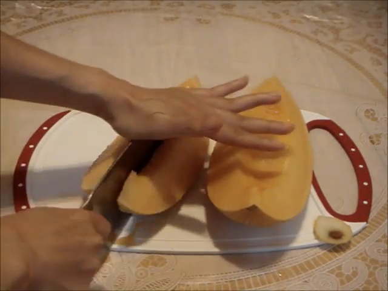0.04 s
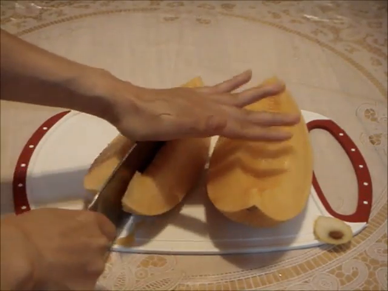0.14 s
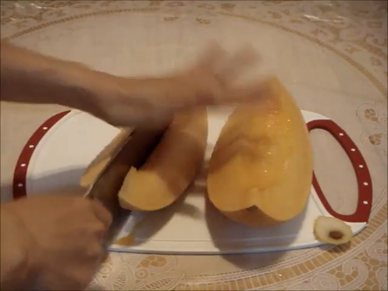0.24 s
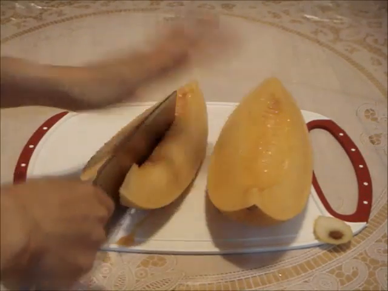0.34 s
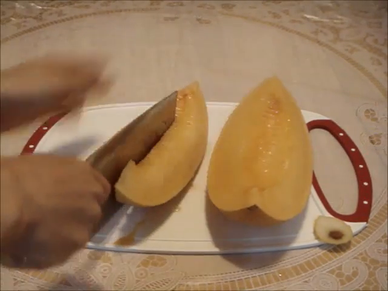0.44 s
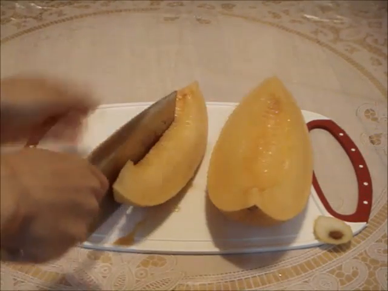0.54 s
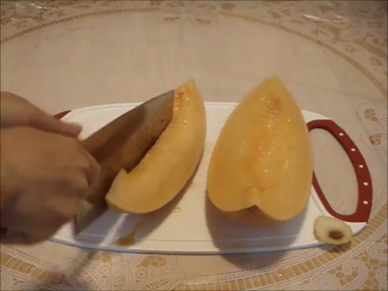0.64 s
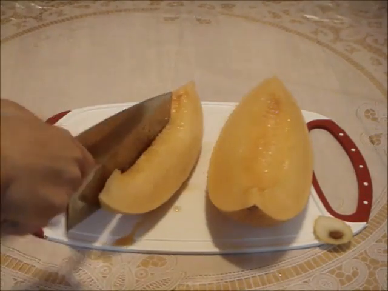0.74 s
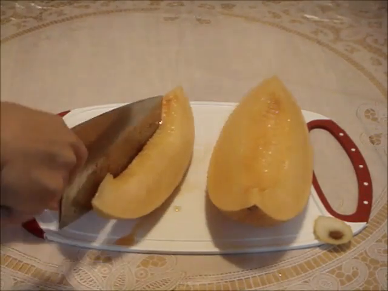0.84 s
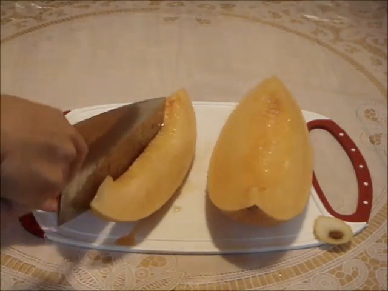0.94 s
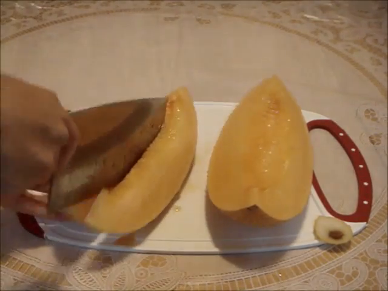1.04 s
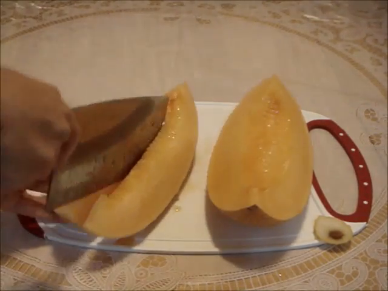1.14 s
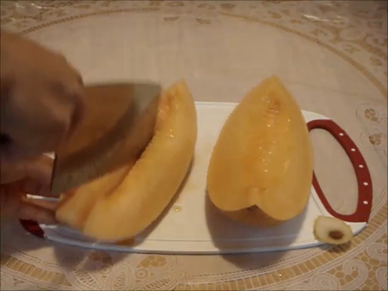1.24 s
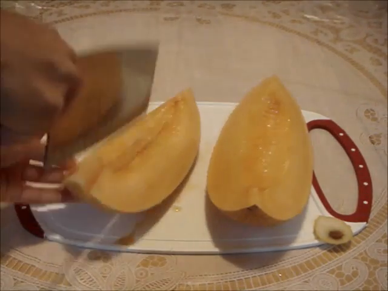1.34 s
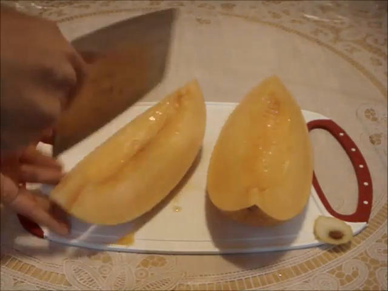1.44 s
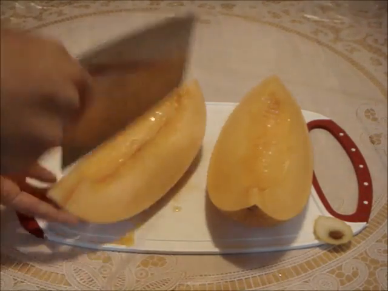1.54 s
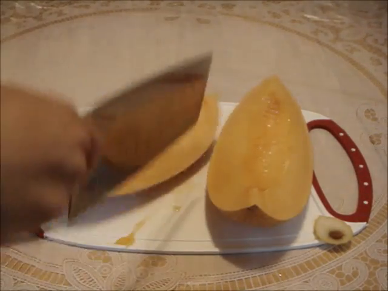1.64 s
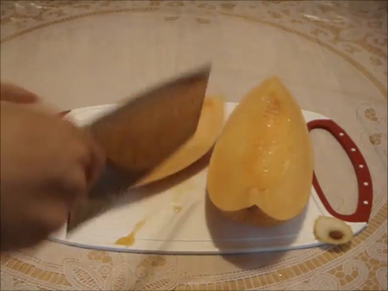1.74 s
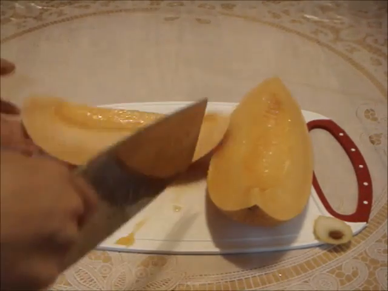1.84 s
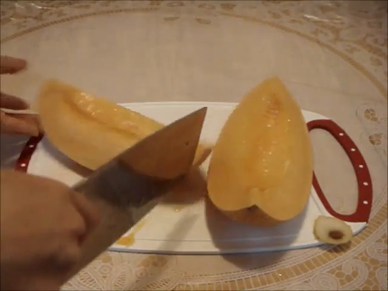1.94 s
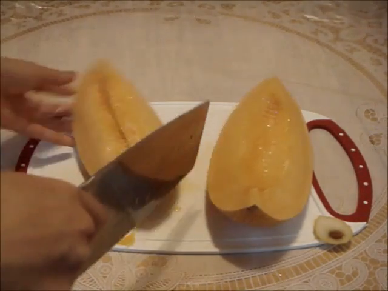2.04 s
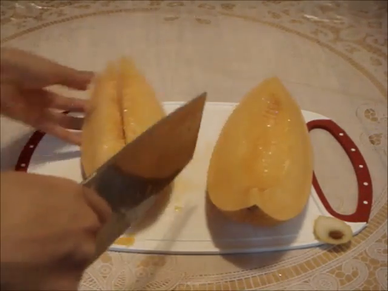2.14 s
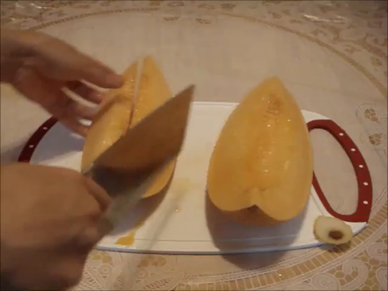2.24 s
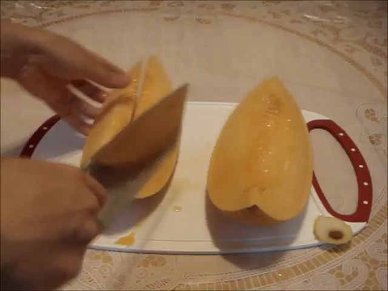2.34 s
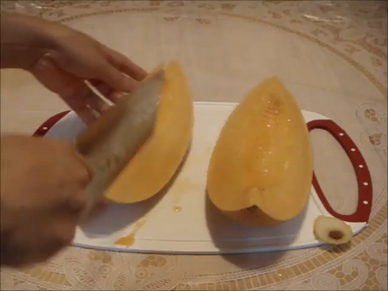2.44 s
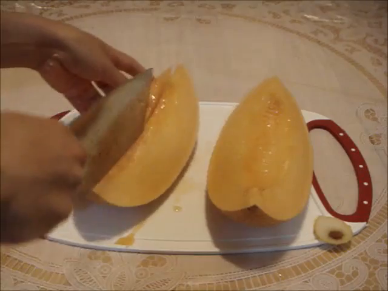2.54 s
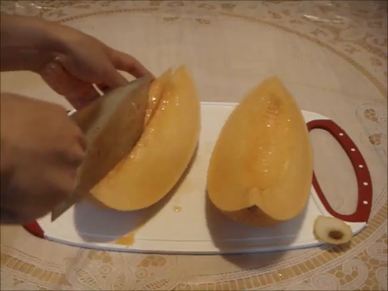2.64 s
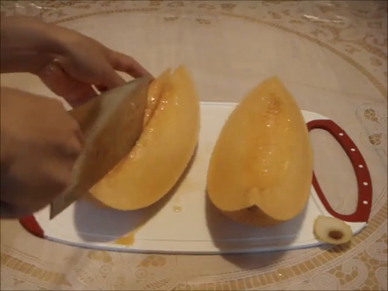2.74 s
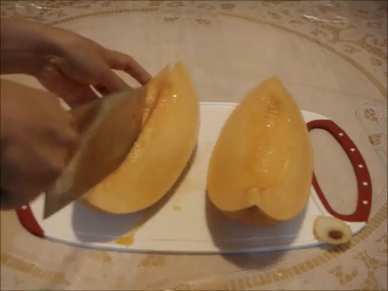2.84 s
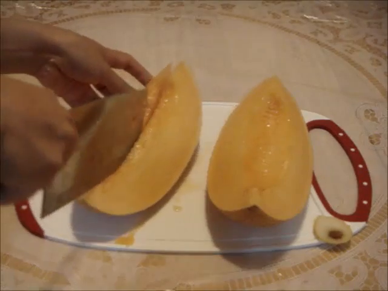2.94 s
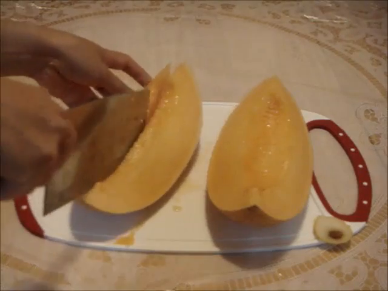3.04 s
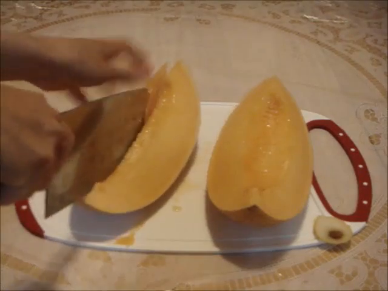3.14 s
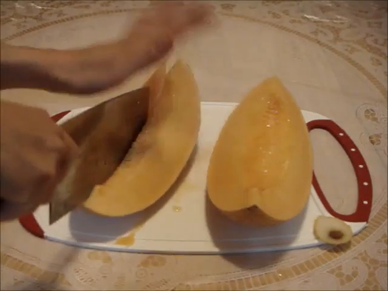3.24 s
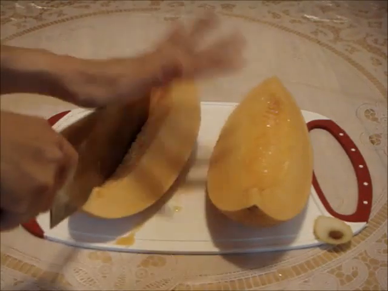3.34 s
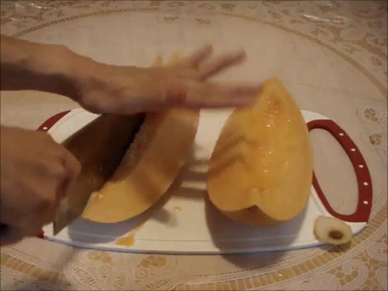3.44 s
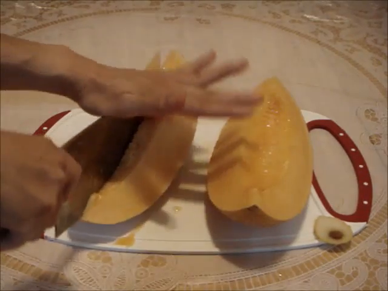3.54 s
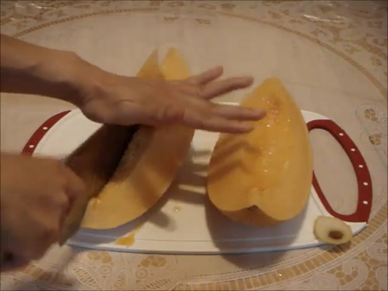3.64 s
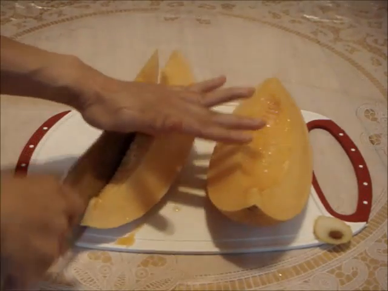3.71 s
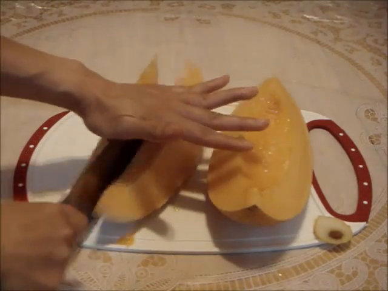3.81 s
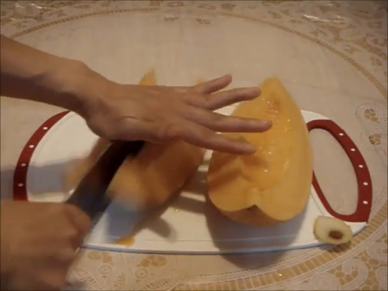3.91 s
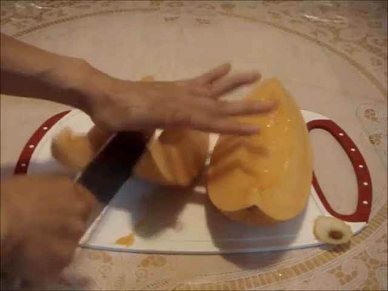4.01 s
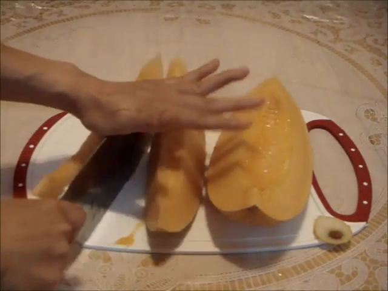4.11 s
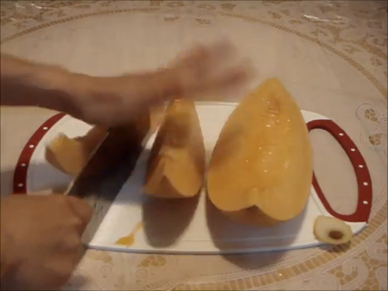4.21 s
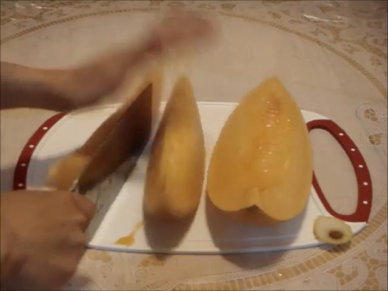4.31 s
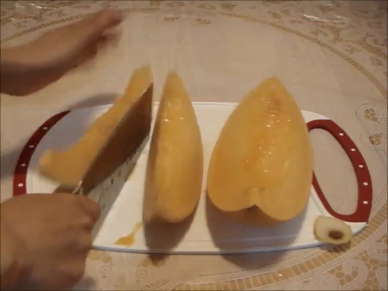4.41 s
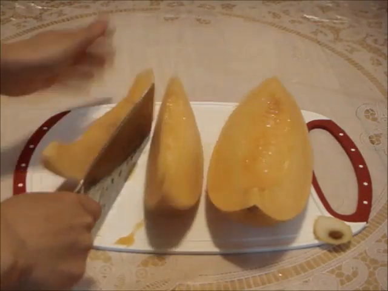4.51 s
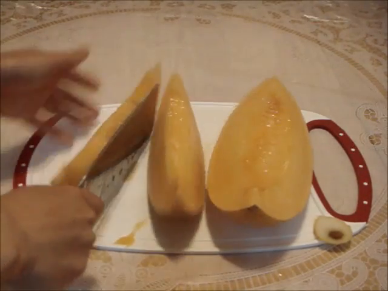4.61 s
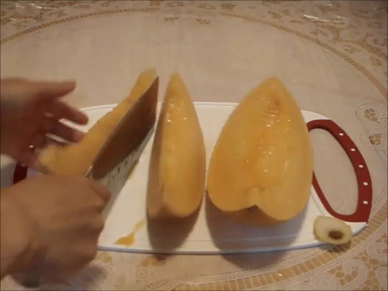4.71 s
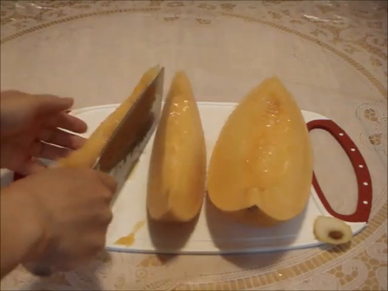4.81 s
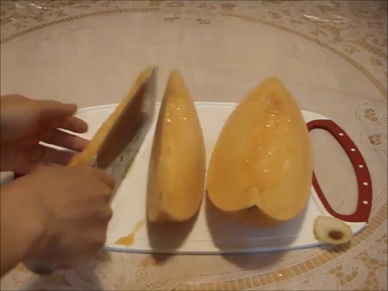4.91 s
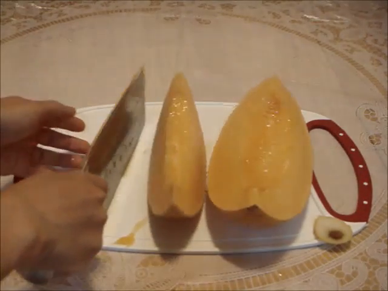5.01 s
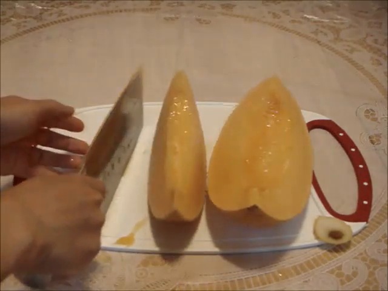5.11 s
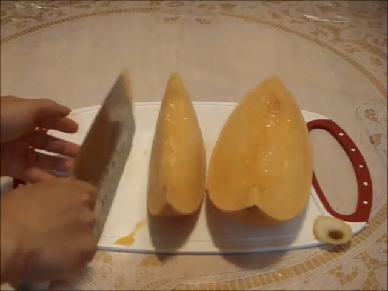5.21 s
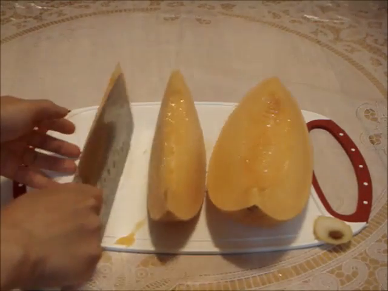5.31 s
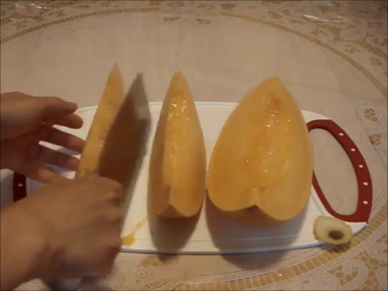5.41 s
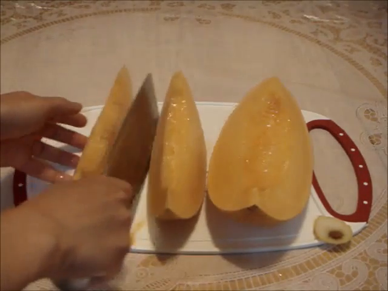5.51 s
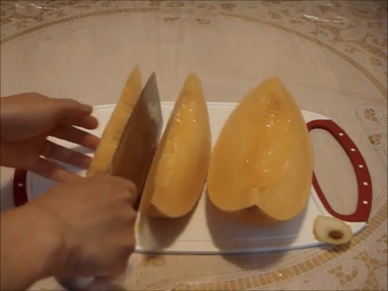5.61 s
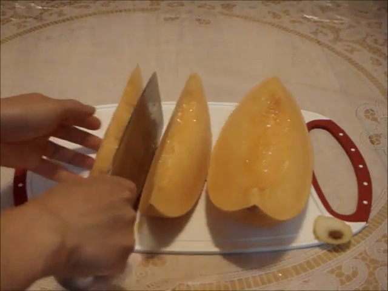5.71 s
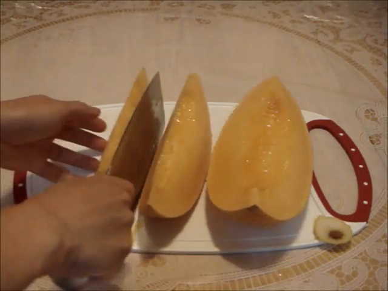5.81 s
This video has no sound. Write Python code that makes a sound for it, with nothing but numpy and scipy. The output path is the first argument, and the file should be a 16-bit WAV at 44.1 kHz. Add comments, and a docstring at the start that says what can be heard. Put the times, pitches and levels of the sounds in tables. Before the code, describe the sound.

In a reverberant kitchen, the tail of a hard knife blow rings from a plastic board and table. Small damped ticks and faint wet slides follow as the blade works through melon. After a quiet pause the rind crackles and splits with several heavy thuds and sharp clicks. Finally the steel blade scrapes the board in brief rough strokes. A close microphone adds steady soft hiss.

```python
"""A broad knife works through a melon on a plastic board in a hard-walled kitchen.
The blade has just slammed down: board and table ring, loose things clatter, and sparse taps make the echo.
Then small damped ticks and soft wet slides of filtered grit lie just above steady microphone hiss.
Later the rind cracks in dense crackle over the melon's body modes, and the halves thud with sharp clicks.
Last, the steel scrapes along: random slips rub the plastic and ring the modes of the blade."""
import sys
import numpy as np
from scipy import signal
from scipy.fft import rfft, irfft, next_fast_len
from scipy.io import wavfile
from scipy.ndimage import uniform_filter1d

SR = 44100
rng = np.random.default_rng(int(sys.argv[2]) if len(sys.argv) > 2 else 0)


def volts_from_db(level):
    """Convert decibel levels to linear amplitude ratios."""
    exponent = np.asarray(level, float) / 20
    return 10 ** exponent


def store_pcm(level_fs):
    """Save levels as 16-bit WAV."""
    pcm = np.round(np.clip(level_fs, -1, 1) * 32767).astype(np.int16)
    wavfile.write(sys.argv[1], SR, np.atleast_2d(pcm).T)


N = 258426  # samples heard
LEAD = 0.06  # s computed ahead of time 0, so that the slam is already ringing
FULL = N + round(LEAD * SR)
TIME = np.arange(FULL) / SR - LEAD  # s

# Blows on the board: t/s, push level/dB, contact time/ms, clatter level/dB, clatter colour f/Hz
BLOWS = [(-.018, -16, 0.92, -11, 650), (3.658, -27, 1.45, -26.5, 306), (3.889, -28, 1.7, -26.5, 634),
         (4.147, -30, 1.96, -35.5, 400), (4.166, -24, 3, -26, 190), (4.582, -49.5, 3.1, -60, 312),
         (4.977, -48, 1.9, -50, 302), (5.291, -62, 2.7, -43, 404)]
CLATTER_S = 0.015  # decay time constant
# Crack of the hardest blow, relative spectrum: f/Hz, level/dB
SLAM = [(88, -41), (150, -56), (195, -12), (347, -4), (629, -8.5), (818, -1.5), (1030, -7.5), (1220, -8.5),
        (1800, -15), (5130, -23), (9800, -39), (12700, -80), (21600, -120)]
SLAM_S, SLAM_DB = -0.018, -26.5
# Modes of the board and the table top under it: f/Hz, level/dB, t60/s
BOARD = [(129, 0, .52), (161, -4, .4), (345, -7, .45), (360, -9, .35), (242, -13, .3), (420, -10, .3),
         (445, -10, .4), (507, -10, .4), (565, -8, .4), (603, -10, .25), (660, -8, .4), (721, -7, .4),
         (790, -9, .4), (850, -5, .5), (930, -6, .45), (971, -7, .4), (1077, -9, .3), (1141, -10, .3),
         (1238, -9, .3), (1393, -10, .3)]
# Reverberation of the kitchen: f/Hz, t60/s
KITCHEN = [(100, 0.48), (300, 0.57), (1000, 0.64), (3000, 0.61), (6000, 0.58), (10000, 0.4)]
# Hiss of microphone and room air, relative spectrum: f/Hz, level/dB
HISS = [(12, -47), (20, -5.5), (97, -5), (143, -2), (260, -1), (329, -1), (394, -2.5), (485, -3),
        (662, -3.5), (1330, -7.5), (2420, -10), (6150, -13.5), (9800, -21), (12700, -41), (21600, -120)]
HISS_DB = -51.5  # rms

# Short ticks, with the sharp clicks of the thuds and of the rind crack: t/s, ring level/dB, f/Hz, t60/s
TICKS = [(0.352, -43, 4700, 0.021), (.6745, -40.5, 2070, 0.022), (0.7436, -54, 5900, 0.029),
         (0.789, -46.5, 4560, 0.015), (1.1794, -35, 1400, 0.0035), (1.303, -44, 3300, 0.013),
         (1.568, -34, 1410, 0.006), (1.6205, -40, 2230, 0.018), (1.645, -42, 1890, 0.011),
         (2.03, -63, 4440, .01), (3.595, -34.5, 3900, 0.0067), (3.658, -21, 1620, 0.0096),
         (3.795, -19, 2970, 0.0073), (4.1656, -25, 2200, 0.005), (4.6997, -43, 2210, 0.031)]
# Soft slides of steel through wet flesh: start t/s, length/s, level/dB, change to the end/dB
SLIDES = [(.45, .12, -58, -10), (.655, 0.026, -40, -1), (.83, 0.095, -50, -4), (1.41, 0.045, -46, -5),
          (1.55, 0.065, -54, 0), (1.73, 0.14, -48.5, -7.5)]
SLIDE_RISE_S, SLIDE_FALL_S = 0.047, 0.013
# Wet flesh, relative spectrum: f/Hz, level/dB
FLESH = [(400, -15), (1000, -3.5), (2000, -4), (4000, -3), (6000, -8.5), (8000, -13.5), (10500, -28),
         (20000, -88.5)]

# Rind giving way: start t/s, length/s, strain level/dB, change to the end/dB, body against crackle/dB
TEAR = [(3.42, 0.17, -57.5, 1.5, -44), (3.588, .065, -49.5, 7.5, -15), (3.66, .13, -48.5, 11.5, -29),
        (3.789, 0.024, -34.5, 3.5, -0.5), (3.82, 0.036, -31.5, 16.5, -13), (3.85, 0.029, -16.5, -6, -7)]
TEAR_RISE_S, TEAR_FALL_S = 0.013, 0.0088
STRAIN_DB, STRAIN_SLOPE = -62, 0.67  # the table feels the strain, not its sharp peaks
# Crackle of the rind, relative spectrum: f/Hz, level/dB
RIND = [(240, -20), (400, -22), (771, -9.5), (994, -21.5), (1150, -9.5), (1600, -18), (2300, -13),
        (3940, -12.5), (4630, -17), (7600, -20.5), (9800, -32.5), (12700, -48), (21600, -120)]
# Body modes of the melon: f/Hz, width/Hz, relative level/dB
MELON = [(350, 71, 7), (575, 24, -8), (707, 18, -3.5), (950, 100, 2), (1146, 38, 4.5), (1416, 56, -23)]
# Force that shakes the table, relative spectrum: f/Hz, level/dB
LOW_PUSH = [(60, -18), (120, -2.5), (400, -0.5), (900, -25), (20000, -101)]

# Strokes along the board: start t/s, length/s, pressure level/dB, change to the end/dB,
# lean onto the flat side/dB
SCRAPES = [(4.69, 0.14, -60, 10.5, 8.5), (4.825, 0.14, -47, -11, 3), (4.97, 0.067, -38.5, 0, -2),
           (5.06, 0.22, -51.5, 0.5, 3), (5.288, 0.018, -48, -1, -8), (5.416, 0.058, -36, 0, -9.5),
           (5.462, 0.15, -35.5, -5.5, 6)]
SCRAPE_RISE_S, SCRAPE_FALL_S = 0.025, 0.014
# Plastic rubbed by the edge, relative spectrum: f/Hz, level/dB
EDGE_RUB = [(590, -39), (1000, -11.5), (2830, -3), (3840, -8.5), (4520, -14), (5320, -17), (7360, -17.5),
            (9800, -57), (12700, -64), (21600, -120)]
# Plastic rubbed by the flat side, relative spectrum: f/Hz, level/dB
FLAT_RUB = [(180, -28), (300, 2), (601, 2.5), (1520, 7), (1670, 1.5), (2040, 6), (2380, -12), (5000, -13),
            (6500, -42), (11000, -120)]
# Steel modes of the blade: f/Hz, width/Hz, level/dB
BLADE = [(2800, 10, 5), (3040, 18, -6), (3337, 22, -1), (3390, 22, -2), (4370, 20, -9), (4645, 26, -6),
         (4676, 26, -7), (5780, 90, -18), (6130, 50, -13), (6270, 35, -11), (6820, 60, -19),
         (7190, 80, -21), (7510, 35, -19), (7780, 70, -16), (8570, 110, -26)]
LOW_STEEL_DB, HIGH_STEEL_DB, DRAG_DB = 14, 3.5, -71.5
# Steel and table grow more slowly than the rub itself
LOW_STEEL_SLOPE, HIGH_STEEL_SLOPE, DRAG_SLOPE = 0.84, 0.57, 0.64
BITE_DB = 30  # the edge catches the plastic as each stroke sets in and strikes the steel


def evened(x):
    """Scales to rms 1."""
    return x / np.sqrt(np.mean(x ** 2) + 1e-20)


def read(points, hz):
    """Reads a table on a log-frequency axis."""
    f, value = np.transpose(points)
    return np.interp(np.log(hz + 1), np.log(f + 1), value)


def add(mix, s, sound):
    """Mixes a sound in at time s."""
    part = mix[round((s + LEAD) * SR):][:len(sound)]
    part += sound[:len(part)]


def colour(x, points):
    """Filters x by a spectrum and scales it to rms 1."""
    size = next_fast_len(len(x))
    gain = volts_from_db(read(points, np.fft.rfftfreq(size, 1 / SR)))
    return evened(irfft(rfft(x, size) * gain, size)[:len(x)])


def resonate(x, hz, width):
    """Two-pole resonance with gain 1 at its centre."""
    r = np.exp(-np.pi * width / SR)
    b = (1 - r * r) / 2
    return signal.lfilter([b, 0, -b], [1, -2 * r * np.cos(2 * np.pi * hz / SR), r * r], x)


def high_pass(x, hz):
    """Removes the bass below hz."""
    return signal.sosfilt(signal.butter(6, hz, "high", fs=SR, output="sos"), x)


def grit(per_s, spread_db, chatter_db):
    """Dense random slips, some larger than the rest, coming in uneven clumps."""
    size = volts_from_db(spread_db * np.minimum(rng.exponential(1, FULL), 3)) * rng.standard_normal(FULL)
    smooth = uniform_filter1d(rng.standard_normal(FULL), size=400)
    clumps = evened(uniform_filter1d(smooth, size=400))
    happens = rng.random(FULL) < per_s / SR
    return evened(size * volts_from_db(chatter_db * clumps) * happens)


def strokes(rows, rise_s, fall_s, slope=1, extra=0):
    """Gain over time: each stroke rises, drifts in level and dies away; extra weighs the last column."""
    gain = np.zeros(FULL)
    for start, length, db, change_db, *more in rows:
        u = TIME - start
        level_db = slope * (db + change_db * np.clip(u / length, 0, 1)) + extra * sum(more)
        rise = np.clip(u / rise_s, 0, 1) ** 2
        fall = np.exp(-np.maximum(u - length, 0) / fall_s)
        gain += rise * fall * volts_from_db(level_db)
    return gain


def pushes():
    """Each blow pushes the board with a half-sine force, duller as contact lasts longer."""
    force, t = np.zeros(FULL), np.arange(SR // 4) / SR
    for s, db, ms, _, _ in BLOWS:
        push = np.sin(np.pi * np.minimum(t * 1000 / ms, 1))
        add(force, s, volts_from_db(db) * push / push.sum())
    return force


def clatter():
    """Each blow sets off loose clatter in the air: a decaying noise burst in a broad band."""
    out, t = np.zeros(FULL), np.arange(SR // 4) / SR
    for s, _, _, db, hz in BLOWS:
        shake = rng.standard_normal(len(t)) * np.exp(-t / CLATTER_S)
        burst = resonate(resonate(shake, hz, 1.76 * hz), hz, 1.76 * hz)
        start_rms = np.sqrt(np.mean(burst[:400] ** 2))
        add(out, s, volts_from_db(db) * burst / start_rms)
    return out


def slam():
    """The hardest blow cracks: a single click shaped by its spectrum."""
    click = np.zeros(FULL)
    add(click, SLAM_S, np.ones(1))
    return volts_from_db(SLAM_DB) * colour(click, SLAM)


def board(force):
    """Board and table ring at their damped modes, with alternating sign from mode to mode."""
    t, ring = np.arange(SR) / SR, 0
    for k, (hz, db, t60) in enumerate(BOARD):
        ring = ring + (-1) ** k * volts_from_db(db - 60 * t / t60) * np.sin(2 * np.pi * hz * t)
    return signal.fftconvolve(force, ring)[:FULL]


def table_sway(force):
    """The table rocks at two low resonances and shakes the microphone."""
    return volts_from_db(45.5) * resonate(resonate(force, 35, 6.8), 32, 30)


def kitchen(x):
    """Sparse taps of random sign, one in every 16 samples, each band dying at its own speed."""
    taps = np.zeros(SR)
    at = np.arange(200, SR - 16, 16)
    taps[at + rng.integers(0, 16, len(at))] = rng.choice([-1., 1.], len(at))
    hz, t, z = signal.stft(taps, SR, nperseg=256)
    decay = volts_from_db(-60 * t / read(KITCHEN, hz)[:, None])
    tail = signal.istft(z * decay, SR, nperseg=256)[1]
    return signal.fftconvolve(x, tail / np.linalg.norm(tail))[:FULL]


def hiss():
    """Steady noise of microphone and room air."""
    return volts_from_db(HISS_DB) * colour(rng.standard_normal(FULL), HISS)


def ticks():
    """Short ticks and sharp clicks: a damped sine with a splash of noise around its pitch."""
    out, t = np.zeros(FULL), np.arange(2000) / SR
    for s, db, hz, t60 in TICKS:
        ring = volts_from_db(-60 * t / t60) * np.sin(2 * np.pi * hz * t)
        burst = rng.standard_normal(len(t)) * np.exp(-t / 0.002)
        splash = resonate(resonate(burst, hz, 1.4 * hz), hz, 1.4 * hz)
        add(out, s, volts_from_db(db) * (ring + 2.5 * splash))
    return out


def slides():
    """Steel slips softly through wet flesh: clumped grit in the flesh's colour."""
    return strokes(SLIDES, SLIDE_RISE_S, SLIDE_FALL_S) * colour(grit(9000, 3.5, 1.8), FLESH)


def tear():
    """Fibres snap in dense crackle; the hollow melon adds its body and the strain shakes the table."""
    snaps = grit(30000, 1.2, 1.5)
    body = evened(sum(volts_from_db(db) * resonate(snaps, hz, width) for hz, width, db in MELON))
    crackle_gain = strokes(TEAR, TEAR_RISE_S, TEAR_FALL_S)
    body_gain = strokes(TEAR, TEAR_RISE_S, TEAR_FALL_S, extra=1)
    strain_gain = volts_from_db(STRAIN_DB) * strokes(TEAR, TEAR_RISE_S, TEAR_FALL_S, STRAIN_SLOPE, extra=0.26)
    strain = strain_gain * colour(snaps, LOW_PUSH)
    return strain, crackle_gain * colour(snaps, RIND) + body_gain * body


def scrape():
    """Slips of the blade drive the plastic surface, the steel modes and the table."""
    slips = grit(12000, 1.8, 2.6)
    edge = strokes(SCRAPES, SCRAPE_RISE_S, SCRAPE_FALL_S, extra=-0.5)
    flat = strokes(SCRAPES, SCRAPE_RISE_S, SCRAPE_FALL_S, extra=0.5)
    bites = np.zeros(FULL)
    bites[[round((row[0] + SCRAPE_RISE_S + LEAD) * SR) for row in SCRAPES]] = volts_from_db(BITE_DB)
    low = volts_from_db(LOW_STEEL_DB) * edge ** LOW_STEEL_SLOPE * (slips + bites)
    high = volts_from_db(HIGH_STEEL_DB) * edge ** HIGH_STEEL_SLOPE * slips
    steel, knots = 0, np.arange(0, FULL + 2000, 2000)
    for k, (hz, width, db) in enumerate(BLADE):
        # the touching point wanders along the edge
        contact_db = 1.7 * np.interp(np.arange(FULL), knots, rng.standard_normal(len(knots)))
        drive = low if k < 7 else high  # the first seven modes are the low steel
        steel = steel + volts_from_db(db) * resonate(volts_from_db(contact_db) * drive, hz, width)
    rub = edge * colour(slips, EDGE_RUB) + flat * colour(slips, FLAT_RUB)
    drag = volts_from_db(DRAG_DB) * flat ** DRAG_SLOPE * colour(slips, LOW_PUSH)
    return drag, rub + steel


def scene():
    """All sources near the board, the kitchen's tail, the table's sway and the hiss."""
    push = pushes()
    strain, rind = tear()
    drag, steel = scrape()
    table = board(push + drag + strain)
    air = clatter() + slam() + ticks() + slides() + rind + steel
    echo = kitchen(volts_from_db(-3.5) * air + volts_from_db(-6.5) * table)
    near = table + air + high_pass(echo, 200)
    near = high_pass(near, 108)  # small objects radiate no deep bass
    return (near + table_sway(push + strain) + hiss())[None, -N:]


def band_limit(x):
    """A steep low-pass at the top of the band."""
    return signal.sosfilt(signal.butter(12, 9950, fs=SR, output="sos"), x)


def record(dry):
    """Turns the finished mix into the sound that is kept."""
    return band_limit(dry)


dry = scene()
out = record(dry)
store_pcm(out)
```